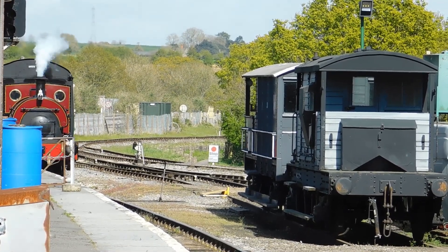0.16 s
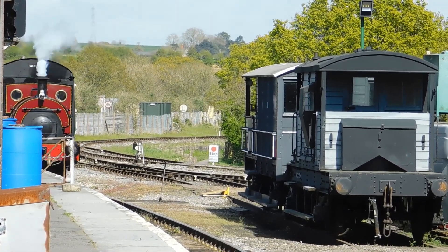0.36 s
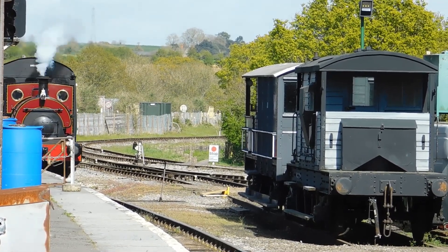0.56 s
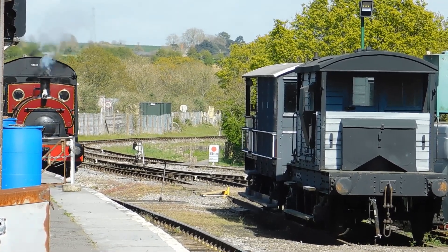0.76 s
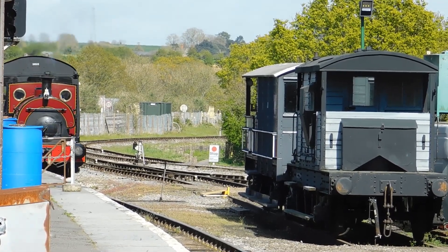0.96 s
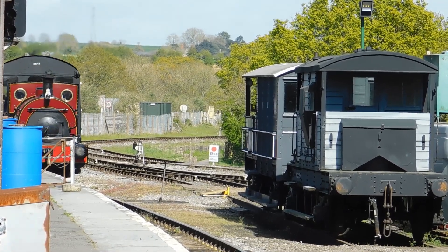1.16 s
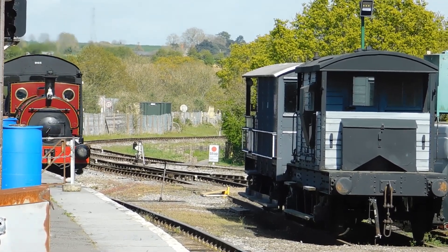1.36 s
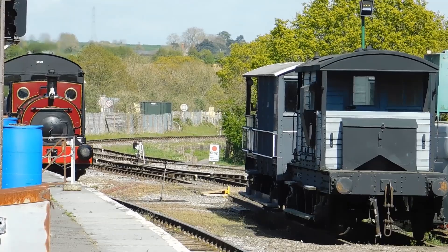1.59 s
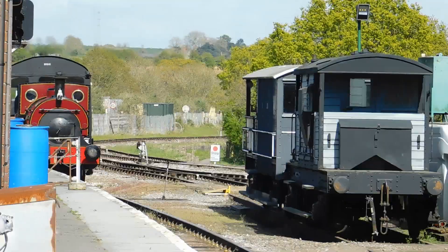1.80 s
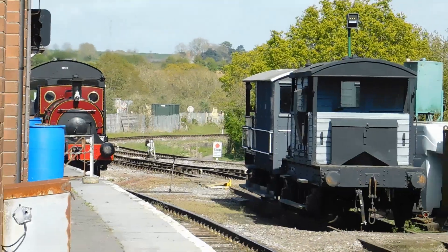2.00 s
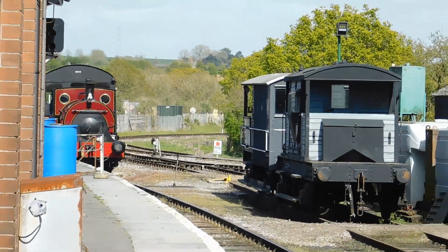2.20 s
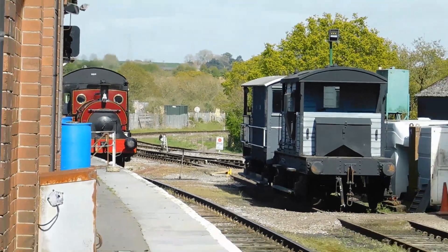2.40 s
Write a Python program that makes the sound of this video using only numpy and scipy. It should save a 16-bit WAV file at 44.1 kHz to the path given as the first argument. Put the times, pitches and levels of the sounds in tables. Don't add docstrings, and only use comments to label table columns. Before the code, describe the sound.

Steam train whistle blows twice, long then short, ringing across an open yard with light wind rumble

```python
import sys
import numpy as np
from scipy import signal
from scipy.io import wavfile
from scipy.ndimage import uniform_filter1d

SR = 44100
rng = np.random.default_rng(int(sys.argv[2]) if len(sys.argv) > 2 else 0)


def magnitude_from_level(level_db):
    exponent = np.asarray(level_db, float) / 20
    return 10 ** exponent


def unload_audio(sound):
    columns = np.transpose(np.atleast_2d(sound))
    steps = np.round(np.clip(columns, -1, 1) * 32767)
    wavfile.write(sys.argv[1], SR, steps.astype(np.int16))


N = 108045

# time in seconds, level in dB.
GUSTS = [(0.0, -64), (0.31, -48), (0.53, -63.5), (0.58, -37.5), (0.76, -64), (0.78, -37.5), (1.0, -56),
         (1.13, -34.5), (1.31, -52.5), (1.34, -44), (1.6, -55), (1.65, -38.5), (1.66, -47), (1.94, -57.5),
         (2.18, -37), (2.31, -41.5), (2.33, -43), (2.45, -43.5)]
# frequency in Hz, density in dB per Hz.
WIND_COLOUR = [(12, -14), (22, 10.5), (38, 5), (103, 0), (165, -4), (373, -18), (550, -38), (800, -68)]
# start in seconds, peak in dB.
BUFFETS = [(0.325, -22.5), (0.587, -45.5), (0.785, -37), (1.072, -37.5), (1.097, -33.5), (1.134, -30),
           (1.192, -26), (1.343, -39), (1.406, -36), (1.638, -27), (2.034, -26), (2.15, -15.5),
           (2.172, -20.5), (2.335, -26.5)]
# frequency in Hz, likeness from 0 to 1.
LIKENESS = [(60, 0.95), (240, 0.7), (950, 0.75), (3770, 0.45), (9000, 0.4), (15000, 0.12)]
# time in seconds, level in dB, lowest and highest frequency in Hz.
TICKS = [
    (0.151, -72.5, 9130, 14730),
    (1.545, -65, 9900, 13560),
    (1.753, -63, 7340, 10250),
]
# frequency in Hz, density in dB per Hz.
MOTOR_COLOUR = [(300, -22), (540, -9), (970, -13), (1260, -2), (2000, -15), (3200, -15.5), (7500, -28),
                (15500, -61.5)]
# frequency in Hz, width in Hz, level in dB.
GEARS = [(993, 49, -30), (1084, 14, -15.5), (1146.3, 90, -6.5), (1256.6, 26, -4), (1365, 22, -10.5),
         (1434, 37, -9.5), (1460, 52, -10), (1656, 23, -14.5), (1863, 24, -16.5), (2118, 27, -16.5),
         (3133, 55, -18), (3182, 32, -15), (4070, 120, -20)]
# time in seconds, level in dB.
DRIVE = [(0, -47.5), (.2, -45.5), (.6, -46.5), (.65, -56), (.7, -67), (1.05, -52.5), (1.3, -50), (1.5, -49),
         (1.54, -47), (1.632, -48.5), (1.645, -95)]
# frequency in Hz, density in dB per Hz.
DRIVE_COLOUR = [(1400, 4.5), (1900, 1), (2800, -5.5), (4000, -8), (6500, -10), (9000, -24), (12000, -23),
                (15700, -30.5)]
# start in seconds, peak in dB, pitch in Hz, left over right in dB.
KNOCKS = [
    (1.634, -33, 329, -12),
    (1.775, -36, 950, 4.5),
    (1.808, -30, 667, 1),
    (1.812, -33, 550, 7),
]
# delay in seconds, long toot in dB, short toot in dB, left over right in dB.
ECHOES = [(.05, -30.5, -22.5, 12.5), (.175, -21, -19.5, -20), (.318, -23, -12, 4.5),
          (.40, -28, -35.5, 13.5), (.525, -28.5, -10.5, 3), (.62, -28, -25.5, 1.5), (.72, -31.5, -33, 8),
          (.925, -32.5, -21.5, 0.5), (.985, -55, -29, -0.5), (1.1, -41, -24, 5.5), (1.22, -45, -43, 8)]
# time in seconds, pitch in Hz, level in dB.
LONG = [
    (.238, 752, -31.5),
    (.262, 746, -15),
    (.33, 752, -11.5),
    (.41, 757, -16.5),
    (.45, 756.5, -15),
    (.54, 760, -10.5),
    (.612, 755.5, -10.5),
    (.632, 757, -19.5),
    (.67, 760, -22),
]
# time in seconds, pitch in Hz, level in dB.
SHORT = [
    (.668, 808.5, -30),
    (.692, 807, -11.5),
    (.709, 794, -14.5),
    (.725, 796.2, -12),
    (.778, 795, -19),
    (.80, 798.5, -10.5),
    (.87, 789.1, -24.5),
    (.93, 790, -41.5),
    (.99, 792, -44),
]
# multiple of the pitch, level in the long toot in dB, level in the short
# in dB, share of the edge in the long, share in the short.
OVERTONES = [(2, -39, -31, 0.7, 0.43), (3, -36.5, -40.5, 1.0, 0.45), (4, -47, -43.5, 0.13, 1),
             (5, -69, -53, 0.68, 1.53), (6, -61, -61, 0.48, 1.2), (7, -73.5, -66.5, 0.9, 1.8)]
# time in seconds, lift in dB.
EDGE = [(.24, 5), (.28, -11.5), (.34, -7.5), (.37, -0.5), (.43, 7), (.52, 3), (.61, 1.5), (.66, -23.5),
        (.685, 6), (.73, 7), (.78, 1.5), (.82, -6.5), (.88, -2), (.94, -8.5), (.99, -18.5)]
# centre in seconds, half width in seconds, depth in dB.
FADES = [
    (.419, 0.013, 9),
    (.575, .017, 13.5),
    (.975, .01, 14),
]
# start in seconds, length in seconds, pitch in Hz, glide in Hz, level in dB.
CHIFF = [
    (0.215, 0.021, 745, -5.5, -30),
    (0.218, 0.048, 815, -8, -29),
    (0.65, 0.12, 767.5, 4, -18),
    (0.667, 0.049, 826, -27, -25.5),
    (0.801, 0.07, 756, -45, -11),
    (0.872, 0.087, 762, 12, -18.5),
    (0.926, 0.056, 752, 10, -20.5),
    (1.028, 0.084, 752, -3.5, -27),
]
# time in seconds, level in dB.
JET = [(.21, -85.5), (.235, -39.5), (.30, -42.5), (.42, -43), (.60, -44.5), (.655, -74.5), (.68, -36),
       (.79, -35.5), (.83, -37.5), (1.02, -50), (1.1, -59.5)]
# frequency in Hz, density in dB per Hz.
JET_COLOUR = [(900, -9), (1600, -12), (2100, -12.5), (3100, -15.5), (5000, -27), (8000, -34), (12000, -39),
              (15700, -47.5)]


def rms_one(x):
    return x / np.sqrt(np.mean(x ** 2) + 1e-20)


def in_time(rows):
    s, *columns = np.transpose(rows)
    return [np.interp(np.arange(N) / SR, s, c) for c in columns]


def at_hz(points, hz):
    table_hz, value = np.transpose(points)
    return np.interp(np.log(hz), np.log(table_hz), value)


def drift(rate_hz):
    r = np.exp(-80 * np.pi * rate_hz / SR)
    slow = signal.lfilter([1], [1, -2 * r, r * r], rng.standard_normal(N // 40 + 2002))
    slow = slow[2000:]
    return np.interp(np.arange(N) / 40, np.arange(len(slow)), rms_one(slow))


def resonance(x, hz, width_hz):
    r = np.exp(-np.pi * width_hz / SR)
    poles = [1, -2 * r * np.cos(2 * np.pi * hz / SR), r * r]
    return signal.lfilter(np.array([1, 0, -1]) * (1 - r * r) / 2, poles, x)


def pan(x, db):
    return x * magnitude_from_level(np.array([[db / 2], [-db / 2]]))


def band_pass(x, low_hz, high_hz):
    return signal.sosfilt(signal.butter(2, [low_hz, high_hz], "band", fs=SR, output="sos"), x)


def banded_noise(spectrum, patchy_db, force_db=0, brighten=0):
    out, together = 0, drift(25)
    edges = 18 * 2 ** np.arange(0, 10.1, 1 / 3)
    white = rng.standard_normal((2, 2, N))
    for k, (low, high) in enumerate(zip(edges, edges[1:])):
        hz = np.sqrt(low * high)
        if not spectrum[0][0] * .8 < hz < spectrum[-1][0] * 1.1:
            continue
        mid, side = band_pass(white[k % 2], low, high)
        alike = np.clip(at_hz(LIKENESS, hz), 0, 1)
        flicker_db = patchy_db * np.clip(hz / 90, 0, 1) * (together + .5 * drift(23))
        gain = magnitude_from_level(at_hz(spectrum, hz) + flicker_db + force_db * brighten * np.log2(hz / 200))
        out = out + gain * (np.sqrt(1 + alike) * mid + np.sqrt(1 - alike) * side * [[1], [-1]])
    return rms_one(out)


def buffets():
    puff_s, cut_hz, level_db = 0.0084, 394, -13.5
    s = np.arange(N) / SR
    shape = sum(magnitude_from_level(db + level_db) * np.exp(-((s - at - puff_s) / puff_s) ** 2) for at, db in BUFFETS)
    return shape * rms_one(band_pass(rng.standard_normal(N), 60, cut_hz))


def wind():
    lump_db, left_db, right_db = 2.6, 7.5, -5
    right_follows, leak_db, breeze_db = 0.26, -17.5, -53.5
    db, = in_time(GUSTS)
    swing = db - db.mean()
    left_rumble = rms_one(banded_noise(WIND_COLOUR, lump_db, swing, brighten=0.27)[0])
    left = magnitude_from_level(db + left_db) * left_rumble + buffets()
    right_rumble = rms_one(banded_noise(WIND_COLOUR, lump_db)[0])
    right = magnitude_from_level(db.mean() + right_follows * swing + right_db) * right_rumble
    breeze = pan(magnitude_from_level(breeze_db) * banded_noise(WIND_COLOUR, 0.7)[0], 7.0)
    return np.array([left, right + magnitude_from_level(leak_db) * left]) + breeze


def ticks():
    s, half_s, out = np.arange(N) / SR, .004, 0
    for at, db, low_hz, high_hz in TICKS:
        rustle = rms_one(band_pass(rng.standard_normal(N), low_hz, high_hz))
        out = out + magnitude_from_level(db) * np.exp(-((s - at) / half_s) ** 2) * rustle
    return out


def knocks():
    t60_s, rise_s, out = 0.033, 0.0012, 0
    for at, db, hz, pan_db in KNOCKS:
        s = np.maximum(np.arange(N) / SR - at, 0)
        ring = magnitude_from_level(db - 60 * s / t60_s) * (1 - np.exp(-s / rise_s)) * np.sin(2 * np.pi * hz * s)
        out = out + pan(ring, pan_db)
    return out


def motor():
    gears_db, whir_db, pan_db = -47, -47, 8
    noise, gears = rng.standard_normal(N), 0
    for hz, width_hz, db in GEARS:
        ring = resonance(resonance(noise, hz, width_hz), hz, width_hz)
        gears = gears + magnitude_from_level(db + 1.8 * drift(4.5)) * rms_one(ring)
    out = pan(magnitude_from_level(gears_db) * rms_one(gears), pan_db)
    out += magnitude_from_level(whir_db) * banded_noise(MOTOR_COLOUR, patchy_db=1.5)
    out += magnitude_from_level(in_time(DRIVE)[0]) * banded_noise(DRIVE_COLOUR, patchy_db=.6)
    return out + knocks()


def yard(long, short):
    cut_hz, near_s = 2810, 0.17
    t60_s, rise_s, tail_db, tail_long_db = 2.4, .12, -18, -12
    s, out = np.arange(N) / SR, 0
    for delay, long_db, short_db, pan_db in ECHOES:
        low_pass = signal.butter(2, cut_hz * min(1, near_s / delay), fs=SR)
        dull = signal.lfilter(*low_pass, magnitude_from_level(long_db) * long + magnitude_from_level(short_db) * short)
        out = out + pan(np.interp(s - delay, s, dull, left=0), pan_db)
    shared, own = rng.standard_normal(N), rng.standard_normal((2, N))
    tail = (shared + 0.58 * own) * magnitude_from_level(-60 * s / t60_s) * (1 - np.exp(-s / rise_s))
    tail = magnitude_from_level(tail_db) * tail / np.sqrt(np.sum(tail[0] ** 2))
    dull = signal.lfilter(*signal.butter(1, cut_hz, fs=SR), magnitude_from_level(tail_long_db) * long + short)
    return out + signal.fftconvolve(tail, dull[None])[:, :N]


WHISTLE_PAN_DB = 4


def toot(rows, column):
    wobble_hz, breath_db, breath_hz = 1.5, -25, 50
    sway_db, flutter_db = 2, 1.5
    hz, db = in_time(rows)
    s = np.arange(N) / SR
    db = db - sum(depth_db * np.exp(-((s - at) / half) ** 2) for at, half, depth_db in FADES)
    phase = 2 * np.pi * np.cumsum(hz + wobble_hz * drift(17.2)) / SR
    breath = drift(breath_hz) * np.sin(phase) + drift(breath_hz) * np.cos(phase)
    tone = magnitude_from_level(db) * (np.sin(phase) + magnitude_from_level(breath_db) * breath)
    out = pan(tone, WHISTLE_PAN_DB) * magnitude_from_level(sway_db * drift(1.3) * [[.5], [-.5]])
    edge_db, = in_time(EDGE)
    for row in OVERTONES:
        gain = magnitude_from_level(row[column] + row[column + 2] * edge_db + flutter_db * drift(38))
        slip = drift(14)
        for ear in range(2):
            ear_gain = gain * magnitude_from_level(1.8 * drift(24) - 2.5 * ear)
            out[ear] += ear_gain * np.sin(row[0] * phase + slip + 0.55 * drift(24))
    opening = np.clip((s - rows[0][0]) / 0.0097, 0, 1)
    closing = np.clip((rows[-1][0] - s) / 0.0057, 0, 1)
    return np.sqrt(2) * out * opening * closing


def chiff():
    third_db, out = -36, 0
    for at, length, hz, glide_hz, db in CHIFF:
        part = np.clip((np.arange(N) / SR - at) / length, 0, 1)
        phase = 2 * np.pi * np.cumsum(hz + glide_hz * part) / SR
        tone = np.sin(phase) + magnitude_from_level(third_db) * np.sin(3 * phase)
        out = out + pan(magnitude_from_level(db) * np.sin(np.pi * part ** 0.59) * tone, WHISTLE_PAN_DB)
    return out


def whistle():
    jet = magnitude_from_level(in_time(JET)[0]) * banded_noise(JET_COLOUR, patchy_db=1.0)
    long, short = toot(LONG, column=1) + chiff(), toot(SHORT, column=2)
    carry_until_s, loss_db_per_s = 0.7378, 192
    carry = magnitude_from_level(-loss_db_per_s * np.clip(np.arange(N) / SR - carry_until_s, 0, .085))
    return long + short + jet + yard(long[0], short[0] * carry + jet[0])


def scene():
    return whistle() * magnitude_from_level(3.0) + motor() + wind() + ticks()


def band_limit(x):
    return signal.sosfilt(signal.butter(12, 15960, fs=SR, output="sos"), x)


def record(dry):
    duck_above_db, duck_share, recover_db_per_s = -16.5, 0.52, 25.5
    grit_db, grit_from_hz = -44, 8000
    ramp = recover_db_per_s * np.arange(N) / SR
    level_db = 10 * np.log10(uniform_filter1d(np.mean(dry ** 2, axis=0), size=800) + 1e-12)
    wanted_db = duck_share * np.maximum(level_db - duck_above_db, 0)
    duck_db = np.maximum.accumulate(wanted_db + ramp) - ramp
    high_pass = signal.butter(2, grit_from_hz, "high", fs=SR)
    grit = signal.lfilter(*high_pass, rng.standard_normal((2, N)))
    wet = dry + magnitude_from_level(grit_db + level_db) * grit
    return band_limit(wet * magnitude_from_level(-uniform_filter1d(duck_db, size=600)))


dry = scene()
out = record(dry)
unload_audio(out)
```